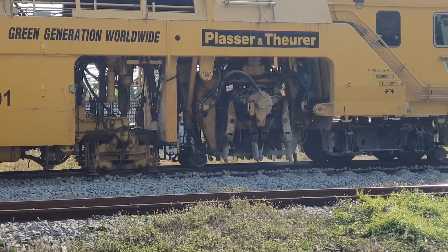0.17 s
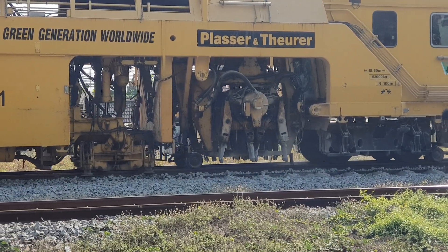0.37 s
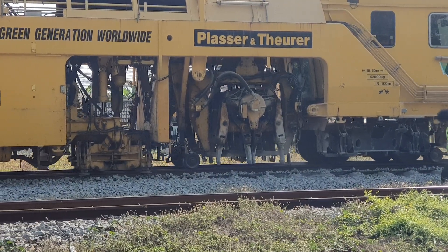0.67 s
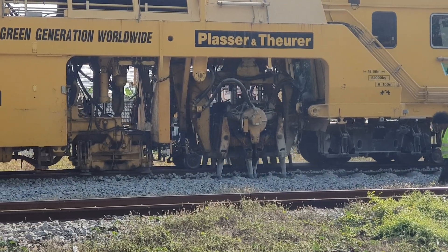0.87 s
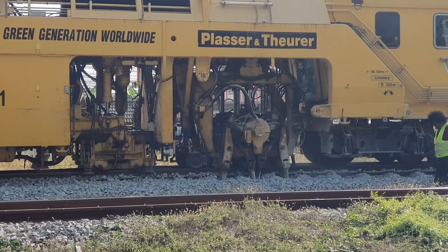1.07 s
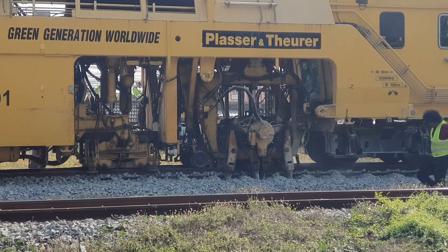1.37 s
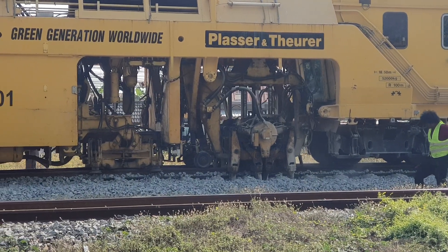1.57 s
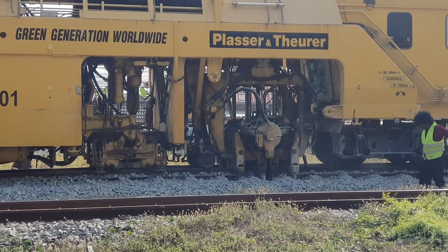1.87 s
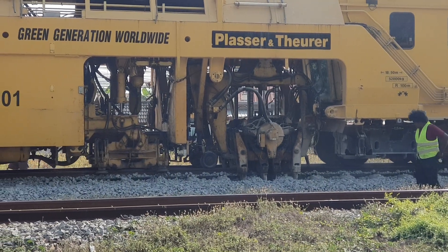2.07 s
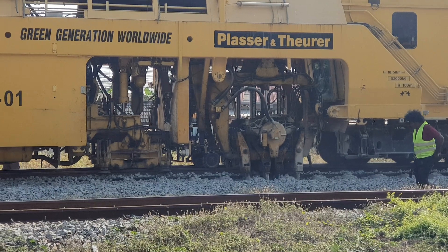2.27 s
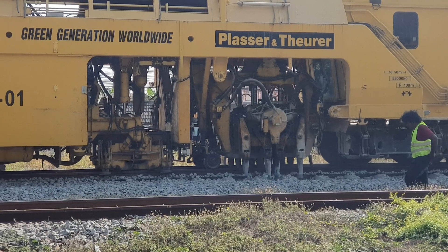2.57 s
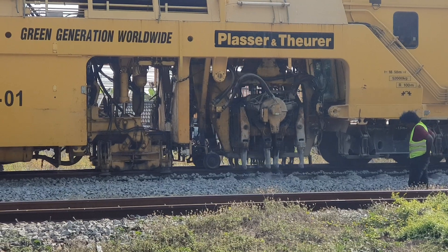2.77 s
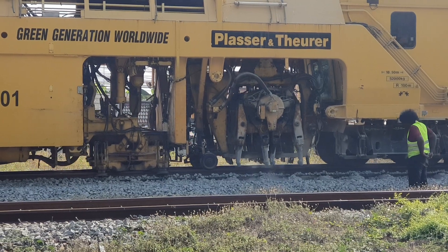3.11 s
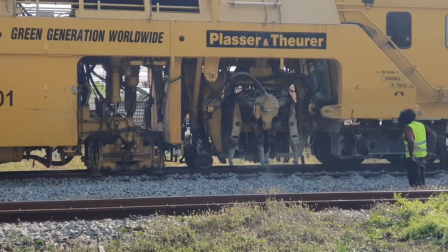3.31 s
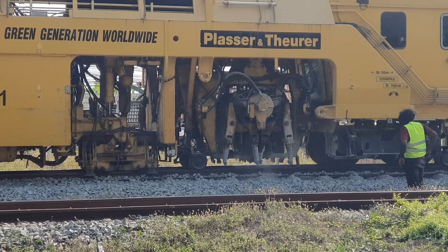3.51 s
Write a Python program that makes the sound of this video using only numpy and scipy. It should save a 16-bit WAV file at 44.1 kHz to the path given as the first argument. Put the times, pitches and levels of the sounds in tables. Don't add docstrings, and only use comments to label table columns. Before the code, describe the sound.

Close lineside stereo pickup of a rail tamping machine: constant engine hum, fan roar and faint hydraulic whine, light knocks, a heavy steel clank with a squeal, then gritty ballast crunching that stops as the tines lift.

```python
import sys
import numpy as np
from scipy import signal
from scipy.fft import rfft, irfft
from scipy.io import wavfile
from scipy.ndimage import uniform_filter1d

SR = 44100
rng = np.random.default_rng(int(sys.argv[2]) if len(sys.argv) > 2 else 0)


def gain_from_decibels(decibels):
    exponent = np.asarray(decibels, float) / 20
    return 10 ** exponent


def bounce(signal):
    frames = np.transpose(np.atleast_2d(signal))
    limited = np.clip(frames, -1, 1)
    pcm = np.round(limited * 32767).astype(np.int16)
    wavfile.write(sys.argv[1], SR, pcm)


N = 160965
T = np.arange(N) / SR
RIGHT_BASS_DB = -3.0


def evened(x):
    return x / np.sqrt(np.mean(x ** 2) + 1e-20)


def read(points, hz):
    f, value = np.transpose(points)
    return np.interp(np.log(hz + 1), np.log(f + 1), value)


def colour(x, points):
    return irfft(rfft(x) * gain_from_decibels(read(points, np.fft.rfftfreq(N, 1 / SR))), N)


def follow(points):
    return np.interp(T, *np.transpose(points))


def drift(rate_hz):
    rates = rate_hz * np.geomspace(.05, 1, num=12)
    return evened(sum(np.sin(2 * np.pi * (f * T + rng.random())) for f in rates))


def turning(s, hz):
    return 2 * np.pi * np.cumsum(np.interp(T, s, hz)) / SR


def add(mix, s, sound):
    part = mix[..., round(s * SR):][..., :sound.shape[-1]]
    part += sound[..., :part.shape[-1]]


def roar():
    # (frequency [Hz], level [dB per Hz])
    roar_spectrum = [(20, -12), (50, 6.5), (110, 4), (200, -1), (1000, 4.5), (3000, -18), (6000, -30.5),
                     (15600, -34)]
    frames, hz = N // 128 + 5, np.fft.rfftfreq(512, 1 / SR)
    a, b, c, d, patches = rng.standard_normal((frames, 257, 5)).T
    patches = uniform_filter1d(patches, size=6, axis=0)
    patches = evened(uniform_filter1d(patches, size=24, axis=1))
    flicker = evened(uniform_filter1d(rng.standard_normal(frames), size=8))
    treble = np.clip(hz[:, None] / 6000, 0, 1)
    z = np.array([a + 1j * b, c + 1j * d]) * gain_from_decibels(0.69 * patches + 1.0 * flicker * treble)
    noise = signal.istft(z, nperseg=512, noverlap=384)[1][:, :N]
    return gain_from_decibels(-26.5 + 0.12 * drift(3.04)) * evened(colour(noise, roar_spectrum))


def loaded(hum):
    # (time [s], level [dB])
    pump_load = [(0, 0.5), (.45, 0.5), (.75, 1), (.95, 1), (1.3, 0.5), (1.7, 0.5), (2.05, 2), (2.35, 1.5),
                 (2.5, -0.5), (3.0, 0), (3.65, 0.5)]
    low = colour(hum, [(1400, 4.0), (3000, -4)])
    return hum + (gain_from_decibels(follow(pump_load)) - 1) * low


def engine():
    # (time [s], firing rate [Hz], level [dB])
    firing = [(0.1, 79.3, -14), (0.35, 78.64, -14), (0.5, 79.3, -14), (0.62, 79.34, -13.5),
              (0.721, 80.72, -16), (0.819, 81.17, -15.5), (0.92, 80.11, -16), (1.02, 79.56, -15.5),
              (1.149, 79.1, -14), (1.3, 78.9, -14.5), (1.6, 78.67, -14), (1.9, 78.6, -13.5),
              (2.15, 78.1, -13.5), (2.35, 78.2, -13.5), (2.499, 76.96, -14), (2.8, 77.65, -14),
              (3.15, 78.1, -14.5), (3.502, 77.6, -14.5)]
    # (multiple of firing rate [1], level [dB])
    crank_orders = [(.667, -40), (1.333, -26.5), (1.5, -30.5), (2, -21), (3.167, -37), (4.417, -30.5),
                    (6.667, -36)]
    wobble_db, wobble_rad, right_lag_s = 2, 0.56, .00019
    s, hz, db = np.transpose(firing)
    turn = turning(s, hz)
    orders = 0
    for multiple, order_db in crank_orders:
        level = gain_from_decibels(order_db + wobble_db * drift(12))
        orders = orders + level * np.sin(multiple * turn + wobble_rad * drift(6))
    tone = np.sqrt(2) * gain_from_decibels(np.interp(T, s, db)) * (np.sin(turn) + orders)
    return np.array([tone, gain_from_decibels(RIGHT_BASS_DB) * np.interp(T - right_lag_s, T, tone)])


def pump():
    # (time [s], pitch [Hz], level [dB])
    whine = [(0, 815, -33.5), (.4, 818.6, -33.5), (.72, 821.6, -39), (0.779, 760, -23.5), (0.881, 768, -40),
             (1.08, 822.3, -34), (1.45, 793, -38), (1.85, 819.2, -42), (2.1, 750.4, -38), (2.3, 753, -37),
             (2.42, 815, -45), (2.8, 800.5, -38.5), (3.25, 829.5, -38.5), (3.65, 835, -32.5)]
    width_hz = 11
    s, hz, db = np.transpose(whine)
    turn = np.exp(1j * turning(s, hz) + 2j * np.pi * np.cumsum(8 * drift(4)) / SR)
    r = np.exp(-np.pi * width_hz / SR)
    noise = rng.standard_normal((2, N)) + 1j * rng.standard_normal((2, N))
    fuzz = signal.lfilter([1 - r], [1, -r], noise)
    fuzz = fuzz / np.sqrt(abs(fuzz))
    return gain_from_decibels(np.interp(T, s, db) - 1.0) * evened((turn * fuzz).real)


def squeal():
    # (time [s], pitch [Hz], level [dB])
    glide = [(.744, 4170, -52), (.754, 4168, -27), (.761, 4182, -16.5), (.767, 4205, -16.5),
             (.773, 4250, -23), (.778, 4235, -31), (.786, 4215, -27), (.793, 4225, -35), (.801, 4240, -55)]
    s, hz, db = np.transpose(glide)
    turn = turning(s, hz)
    level = np.sqrt(2) * gain_from_decibels(np.interp(T, s, db, -120, -120) + 0.97 * drift(151))
    overtones = gain_from_decibels(-38) * np.sin(2 * turn) + gain_from_decibels(-41) * np.sin(3 * turn)
    return np.array([level * (np.sin(turn - lag) + overtones) for lag in (0, 1.4)])


def ringing():
    start_s, stop_s, ring_hz, ring_db, t60_s = .792, .897, 4172, -36.5, 1.6
    after = T - start_s
    level = gain_from_decibels(ring_db - 60 * np.maximum(after, 0) / t60_s + 1.2 * drift(81))
    level *= np.clip(after / 0.0067, 0, 1) * np.clip((stop_s - T) / .008, .25, 1)
    return level * np.sqrt(2) * np.sin(2 * np.pi * ring_hz * T - np.array([[0], [1.3]]))


def chirps():
    # (start [s], length [s], pitch [Hz], level [dB], left level trim [dB])
    short_tones = [
        (.583, .042, 3068, -39.5, 0),
        (.62, .055, 3062, -41.5, 0),
        (.719, .016, 1240, -30, -2),
        (.697, .035, 3083, -38.5, 0),
        (.728, .024, 3073, -41, 0),
        (.722, .045, 2150, -39, 0),
        (.767, .013, 4410, -33, 0),
        (.788, .015, 4330, -35, 0),
        (.832, .04, 11435, -41, -12),
    ]
    out = np.zeros((2, N))
    for s, length, f, db, left_db in short_tones:
        t = T[:round(length * SR)]
        swell = np.sqrt(2 * abs(np.sin(np.pi * (t / length) ** 0.81)))
        swell = swell * gain_from_decibels(0.2 + 1.3 * drift(130)[:len(t)])
        tone = np.sin(2 * np.pi * f * t - np.array([[0], [.9]]))
        add(out, s, swell * tone * gain_from_decibels(db + np.array([[left_db], [-2.5]])))
    return out


def burst(peak_db, tilt_db, t60, body_db, rise):
    # (frequency [Hz], level [dB per Hz])
    frame_thud = [(500, -20), (900, 8), (1300, 11), (2300, -1), (3500, -11), (6000, -26)]
    # (frequency [Hz], level [dB], t60 [s])
    steel_modes = [(903, 2, 0.049), (1215, 3.5, 0.06), (1560, -1, 0.037), (1950, -7, 0.022),
                   (2300, 0, 0.027), (2780, -1, 0.033), (3460, -16, .025)]
    t = T[:6000]
    hz, z = np.fft.rfftfreq(len(t), 1 / SR), rfft(rng.standard_normal((2, 2, len(t))))
    crack_db = tilt_db * np.log2(np.maximum(hz, 2500) / 7000) - 30 * (hz < 700) - 4.0 * (hz > 12800)
    crack = irfft(z[0] * gain_from_decibels(crack_db), len(t)) * gain_from_decibels(-60 * t / t60)
    thud = evened(irfft(z[1] * gain_from_decibels(read(frame_thud, hz)), len(t)))
    thud = thud * gain_from_decibels(body_db - 60 * t / 0.092) * np.minimum(t / 0.0092, 1)
    ring = sum(gain_from_decibels(db + body_db - 7 - 60 * t / s) * np.sin(2 * np.pi * f * t) for f, db, s in steel_modes)
    return gain_from_decibels(peak_db - 9) * np.minimum(t / rise, 1) * (crack + thud + ring)


def clanks():
    # (time [s], peak [dB], tilt [dB per octave], t60 [s], body [dB])
    bank_knocks = [
        (.1735, -31, 2, .1, 0),
        (.1795, -22, -2.5, .075, 4),
        (.4455, -28, 1, .05, 0),
        (.4495, -28, -3, .055, 4),
        (.7213, -19, -1.5, .012, 10.5),
        (.8041, -23, -12, .035, 4),
        (.8065, -30, -13, .06, 20),
    ]
    out = np.zeros((2, N))
    for s, db, tilt_db, t60, body_db in bank_knocks:
        add(out, s, burst(db, tilt_db, t60, body_db, .002))
    return out


def contacts():
    # (time [s], level [dB], tilt [dB per octave], top [Hz])
    clicks = [
        (.7222, -16, -.5, 15000),
        (.8052, -15, 0, 7700),
        (.8095, -22, -7, 4000),
        (.981, -24, -1, 8000),
    ]
    # (delay [s], level [dB])
    frame_echoes = [(0, 0), (.0011, -3), (.0019, -7)]
    out, hz = np.zeros((2, N)), np.fft.rfftfreq(256, 1 / SR)
    for s, db, tilt_db, top_hz in clicks:
        edge = gain_from_decibels(db + tilt_db * np.log2(np.maximum(hz, 1500) / 7000))
        edge = edge / (1 + (hz / top_hz) ** 12) * np.minimum(hz / 1200, 1)
        click = np.roll(irfft(edge), 128)[None]
        for late_s, echo_db in frame_echoes:
            add(out, s + late_s - 128 / SR, gain_from_decibels(echo_db) * click)
    return out


def cracks():
    # (time [s], peak [dB])
    clumps = [(1.3244, -21), (1.642, -24), (1.68, -27), (1.7485, -28), (1.7775, -22.5), (1.905, -25),
              (1.9444, -21.5), (2.066, -23.5), (2.16, -26), (2.191, -26), (2.245, -24), (2.29, -25),
              (2.415, -27), (2.52, -24.5), (2.5699, -29)]
    out = np.zeros((2, N))
    for s, db in clumps:
        add(out, s - .003, burst(db - 1.5, -2.5, 0.068, -22, 0.0058))
    return out


def stones():
    per_s, spread_db, t60_s = 3500, 3.5, 0.019
    size = gain_from_decibels(spread_db * np.minimum(rng.exponential(1, (2, N)), 5))
    size = size * (rng.random((2, N)) < per_s / SR)
    kind, t, out = rng.integers(0, 16, (2, N)), T[:1500], np.zeros((2, N))
    for k in range(16):
        knock = rng.standard_normal(len(t)) * gain_from_decibels(-60 * t / t60_s)
        out += signal.oaconvolve(size * (kind == k), knock[None])[:, :N]
    return out


def ballast():
    # (time [s], level [dB])
    grinding = [(.9, -47), (.965, -42), (.99, -33), (1.13, -34), (1.18, -39), (1.6, -37.5), (1.95, -36.5),
                (2.3, -36), (2.45, -39), (2.575, -39), (2.6, -52), (2.7, -75)]
    # (frequency [Hz], level [dB per Hz])
    grit = [(300, -40), (900, -1), (1600, -6), (3000, -9.5), (5000, -17), (8000, -24), (11000, -26),
            (15600, -33)]
    # (time [s], level [dB])
    thrown = [(.972, -70), (.981, -49), (1.02, -40), (1.06, -42.5), (1.11, -42), (1.14, -50), (1.18, -49),
              (1.3, -59.5)]
    # (frequency [Hz], level [dB per Hz])
    loose = [(1500, -18), (3200, 0.5), (4500, -1.5), (6300, -4.5), (8000, -7), (11000, -13), (15600, -19)]
    knocking = stones()
    ground = gain_from_decibels(follow(grinding) + 1.1 * drift(25)) * evened(colour(knocking, grit))
    flung = gain_from_decibels(follow(thrown) + 0.56 * drift(60)) * evened(colour(knocking[:, ::-1], loose))
    return ground + flung


def ports(pair):
    # (frequency [Hz], width [log units], left [dB], right [dB])
    humps_and_dips = [(368, 0.16, 2.5, 0.4), (622, 0.22, -7.5, -6.5), (707, 0.13, 6.5, -2),
                      (1085, 0.093, -9, -4), (1196, 0.17, 2, -3.5), (1910, 0.1, -2.5, 1.5),
                      (2294, 0.097, 4.5, 4.5), (2390, 0.11, 2.1, -5), (3220, 0.044, 5.5, 0.3),
                      (4880, 0.16, 4.5, 9), (7000, 0.3, 5.5, 2.5), (8330, 0.021, 1, -21),
                      (11300, 0.085, 7, 7.5), (14100, 0.087, 6, 1.5),
                      (4076, 0.026, 4.5, 6), (12300, 0.032, 1.5, 3.5), (7120, 0.025, 3.5, 4.5)]
    # (frequency [Hz], likeness [0 to 1])
    likeness = [(400, .98), (900, .89), (1120, .68), (1350, .83), (2300, .76), (3000, .4), (4800, .58),
                (8000, .25)]
    # (frequency [Hz], phase [radians])
    left_lead = [(60, .09), (430, .15), (620, .8), (830, 0), (1100, 1.0), (1560, .85), (3100, 12.3),
                 (6200, 12.7)]
    treble_lag_s = .00045
    hz, (a, b) = np.fft.rfftfreq(N, 1 / SR), rfft(pair)
    f, width, left_db, right_db = np.transpose(humps_and_dips)
    humps = np.exp(-.5 * (np.log((hz[:, None] + 1) / f) / width) ** 2)
    same = np.clip(read(likeness, hz), 0, 1)
    lag = read(left_lead, hz) + 2 * np.pi * treble_lag_s * np.maximum(hz - 7500, 0)
    right = (same * a + np.sqrt(1 - same ** 2) * b) * np.exp(-1j * lag)
    left = a * gain_from_decibels(humps @ left_db)
    right = right * gain_from_decibels(humps @ right_db + RIGHT_BASS_DB * (hz < 200))
    return irfft(np.array([left, right]), N)


def scene():
    machine = loaded(roar()) + pump()
    tamping = clanks() + contacts() + cracks() + ballast()
    steel = squeal() + ringing() + chirps()
    return engine() + steel + ports(machine + tamping)


def low_pass(x):
    return signal.sosfilt(signal.butter(12, 15710, fs=SR, output="sos"), x)


def record(dry):
    return low_pass(dry)


dry = scene()
out = record(dry)
bounce(out)
```